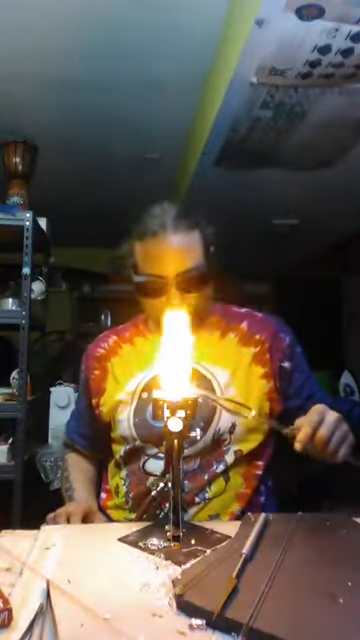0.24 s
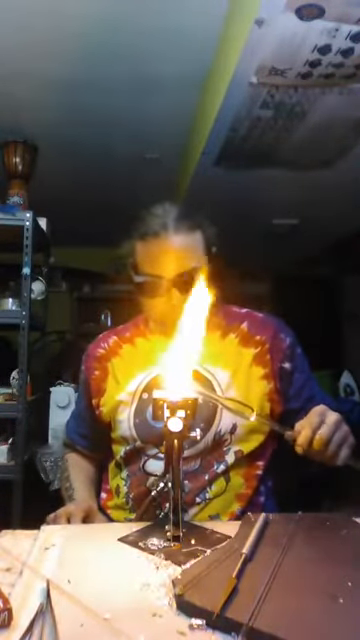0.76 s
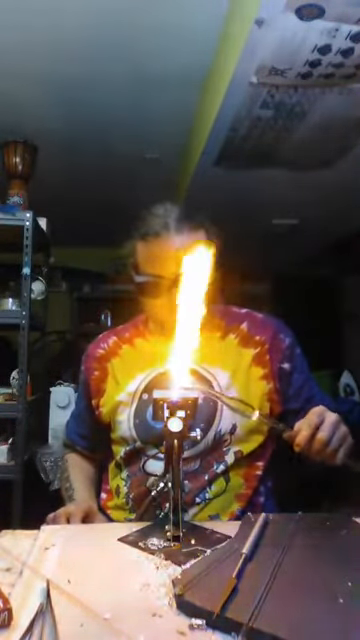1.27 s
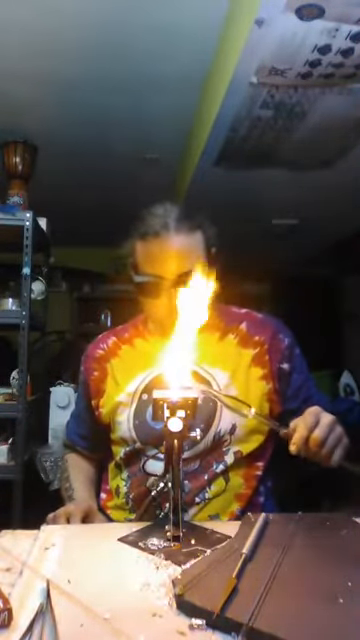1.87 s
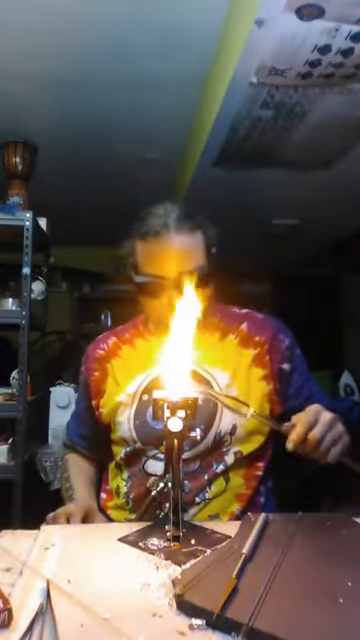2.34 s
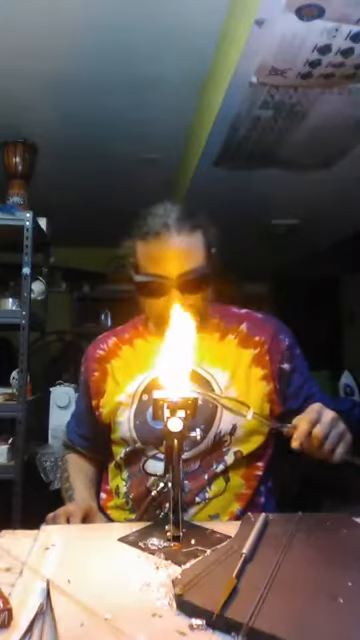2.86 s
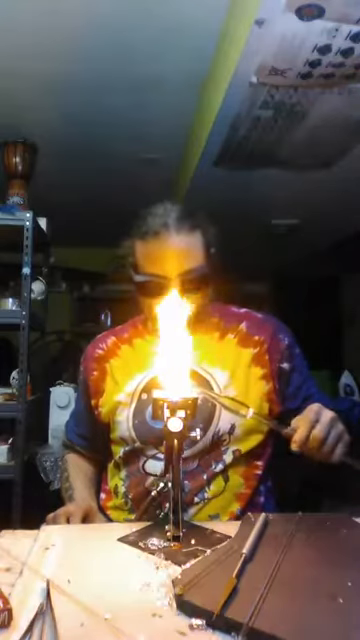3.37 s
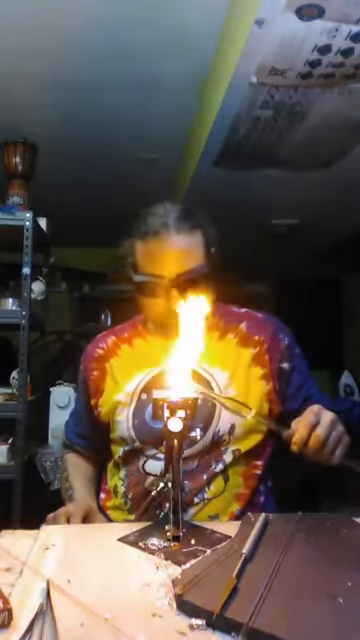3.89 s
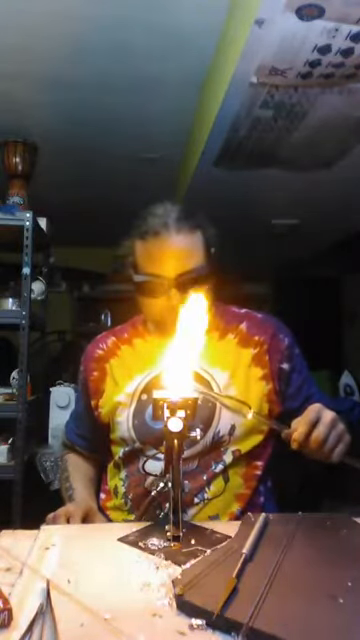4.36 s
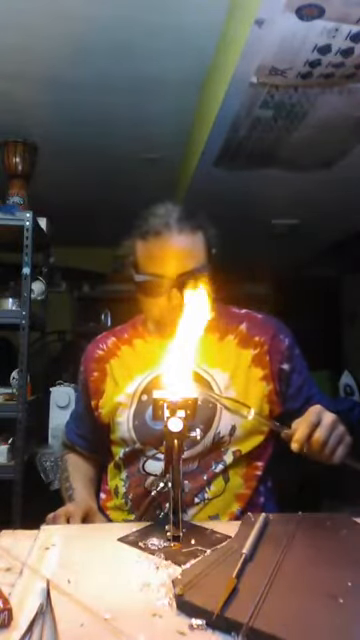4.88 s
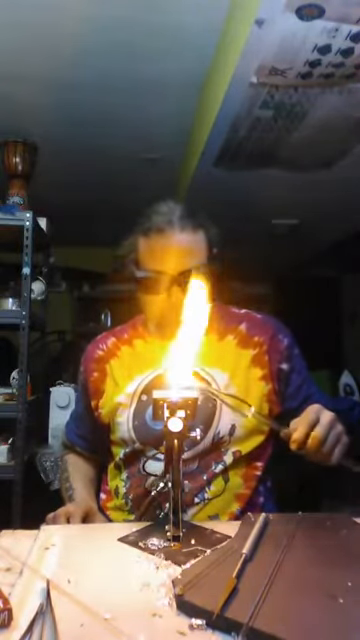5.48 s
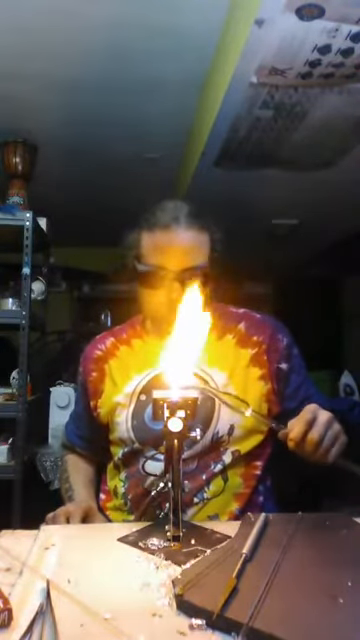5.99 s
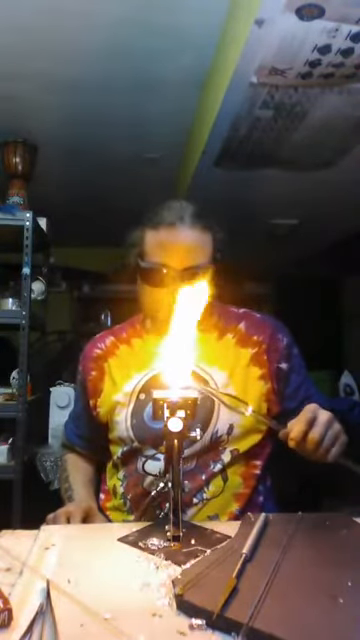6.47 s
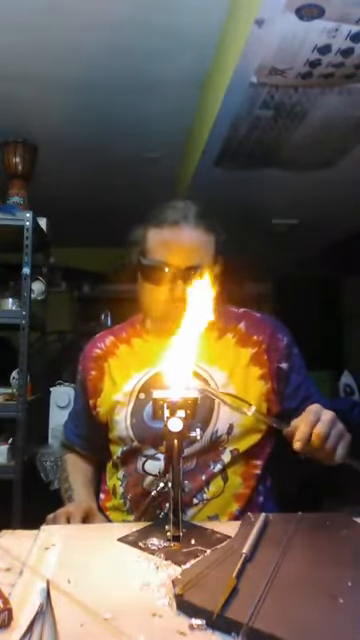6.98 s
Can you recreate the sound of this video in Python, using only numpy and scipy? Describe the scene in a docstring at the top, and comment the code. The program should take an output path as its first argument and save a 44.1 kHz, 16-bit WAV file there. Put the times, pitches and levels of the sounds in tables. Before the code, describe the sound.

In a small workshop a bench torch burns continuously, a bright, airy hiss with a rougher mid roar and low flutter. An extractor fan hums deeply and rumbles behind. Occasional soft, dull pops come from the flame. Near six seconds a short puff of air spits and whistles, then everything cuts out for an instant before resuming. One nearby microphone, same sound on both channels, short room echo.

```python
"""In a workshop a bench torch burns with a bright steady hiss; an extractor fan hums and rumbles behind it.
The torch is noise in three layers (low flutter, mid roar, hiss), the fan is sine tones over low noise.
Now and then the flame swells briefly or gives a soft dull pop, a decaying sine.
Near six seconds a puff of air spits out in spurts of noise; just after, the sound drops out for about 0.13 s.
One microphone feeds both channels."""
import sys
import numpy as np
from scipy import signal
from scipy.fft import rfft, irfft, next_fast_len
from scipy.io import wavfile

SR = 44100
rng = np.random.default_rng(int(sys.argv[2]) if len(sys.argv) > 2 else 0)


def voltage_ratio(level):
    """Linear amplitude factor for a level in decibels (scalar or array-like)."""
    return 10 ** (np.asarray(level, float) / 20)


def bounce(signal):
    """Save signal as a 16-bit WAV file at the path given by the first command-line argument."""
    frames = np.transpose(np.atleast_2d(signal))
    limited = np.clip(frames, -1, 1)
    pcm = np.round(limited * 32767).astype(np.int16)
    wavfile.write(sys.argv[1], SR, pcm)


N = 319284  # length in samples


def rms_one(x):
    """Scale to rms 1."""
    return x / np.sqrt(np.mean(x ** 2) + 1e-20)


def drift(rate_hz):
    """Slow chance wander of spread 1: noise at a fortieth of SR, twice through a one-pole low-pass at rate_hz."""
    pole = np.exp(-80 * np.pi * rate_hz / SR)
    coarse = rng.standard_normal(N // 40 + 4002)
    slow = signal.lfilter([1], [1, -2 * pole, pole * pole], coarse)[4000:]  # the run-in is left off
    return np.interp(np.arange(N) / 40, np.arange(len(slow)), rms_one(slow - slow.mean()))


def coloured_noise(spectrum=((20, -90), (20000, -90)), peaks=(), patchy_db=0, rate_hz=8, count=8):
    """Noise of rms 1 with a smooth spectrum plus resonances; neighbouring bands flicker each in their own way."""
    # narrow cancellations by nearby echoes: centre_hz, width_hz, dip_db
    echo_dips = [(2340, 63, -3), (2840, 48, -2), (3140, 94, -8), (3850, 42, -3), (4270, 44, -5),
                 (4370, 36, -5), (6320, 48, -2), (10920, 72, -2), (13200, 86, -5)]
    size = next_fast_len(N)
    hz = np.maximum(np.fft.rfftfreq(size, 1 / SR), 1)
    corner_hz, corner_db = np.transpose(spectrum)
    power = voltage_ratio(2 * np.interp(np.log(hz), np.log(corner_hz), corner_db, -90, -90))
    for centre_hz, width_hz, top_db in peaks:
        power = power + voltage_ratio(2 * top_db) / (1 + (2 * (hz - centre_hz) / width_hz) ** 2) ** 2
    for centre_hz, width_hz, dip_db in echo_dips:
        power = power * voltage_ratio(2 * dip_db / (1 + (2 * (hz - centre_hz) / width_hz) ** 2))
    noise = rfft(rng.standard_normal(size)) * np.sqrt(power)

    place = count * np.cumsum(power) / np.sum(power)  # overlapping bands, spaced by equal power
    total = np.zeros(N)
    for k in range(count + 1):
        band = irfft(noise * np.clip(1 - np.abs(place - k), 0, 1), size)[:N]
        total += band * voltage_ratio(patchy_db * drift(rate_hz))
    return rms_one(total)


def torch():
    """Turbulent jet: the flame tip flaps in low lumps, the mid roar wanders, the bright hiss is smoother."""
    # flapping of the flame tip: freq_hz, density_db (relative, per Hz)
    flutter_spectrum = [(170, -8), (260, -1), (450, -3.5), (760, -3), (950, -4.5), (1250, -7.5),
                        (1500, -18.5), (1900, -33)]
    # jet noise between the resonances: freq_hz, density_db (relative, per Hz)
    roar_spectrum = [(1100, -40), (1350, -12), (1650, -14), (1750, -6), (2300, -8), (2700, -11),
                     (3100, -11), (3600, -12), (4300, -20), (4500, -30)]
    hiss_spectrum = [(4200, -42), (4450, -13), (5250, -13), (5400, -9), (6300, -11), (8400, -9), (9100, -5),
                     (10500, -12), (10900, -13), (12600, -12), (12850, -17), (13250, -14), (13500, -13),
                     (14000, -14)]
    # resonances of nozzle, bench and room: centre_hz, width_hz, density_db (relative, per Hz)
    roar_peaks = [(1440, 54, -11), (1590, 100, -14), (1750, 45, -5), (1900, 45, -5), (1960, 30, -6),
                  (2070, 104, -1), (2250, 54, -10), (2370, 47, -7), (2630, 325, -4), (2750, 38, -6),
                  (2940, 70, -6), (3180, 192, -6), (3410, 72, -9), (3520, 163, -8), (3690, 67, -12),
                  (3900, 50, -10), (4020, 165, -12), (4200, 111, -12), (4350, 125, -13)]
    hiss_peaks = [(4580, 341, -13), (4870, 69, -10), (5060, 184, -15), (5340, 46, -7), (5410, 48, -8),
                  (5530, 88, -5), (5750, 70, -5), (5890, 100, -7), (6040, 125, -6), (6530, 125, -10),
                  (6920, 100, -11), (7290, 36, -9), (7680, 36, -12), (7930, 61, -7), (8090, 45, -10),
                  (8750, 200, -4), (9060, 241, -2), (9310, 42, -4), (9390, 42, -2), (9640, 200, -6),
                  (9960, 44, -5), (10170, 47, -7), (10420, 201, -7), (10620, 130, -4), (11000, 90, -9),
                  (11150, 150, -9), (11300, 100, -8), (11540, 200, -10), (11980, 54, -14), (12390, 149, -9),
                  (13540, 56, -16), (13890, 184, -13)]
    # brief swells of the flame: centre_s, length_s, flutter_gain_db, roar_gain_db
    swells = [(.21, .08, .5, 2), (1.2, .15, 3.5, 0), (4.52, .04, 0, 2.5), (4.95, .2, .5, 1.2),
              (5.83, .05, 0, 3), (5.92, .04, 4, 0)]
    wander_hz = 2.5

    gust = drift(7.6)  # shared by roar and hiss
    flutter_db = -51.5 + 0.8 * drift(wander_hz) + 1.2 * drift(20.0)
    roar_db = -43.1 + 0.4 * drift(wander_hz) + 0.32 * gust
    hiss_db = -36.5 + 0.25 * drift(wander_hz) + 0.34 * gust
    for centre_s, length_s, flutter_gain_db, roar_gain_db in swells:
        swell = np.exp(-((np.arange(N) / SR - centre_s) / length_s) ** 2)
        flutter_db = flutter_db + flutter_gain_db * swell
        roar_db = roar_db + roar_gain_db * swell

    flutter = voltage_ratio(flutter_db) * coloured_noise(flutter_spectrum, patchy_db=2.5, rate_hz=12.4, count=10)
    roar = voltage_ratio(roar_db) * coloured_noise(roar_spectrum, roar_peaks, patchy_db=2.4, rate_hz=10.2, count=12)
    hiss = voltage_ratio(hiss_db) * coloured_noise(hiss_spectrum, hiss_peaks, patchy_db=0.86, rate_hz=12.0, count=12)
    return flutter + roar + hiss


def flame_pops():
    """Soft dull pops of the flame: each is a sine that swells quickly and dies away."""
    # pops, levels ahead of the room: start_s, peak_db, pitch_hz
    pops = [(1.102, -41, 455), (1.159, -47, 444), (2.129, -44.5, 775), (3.123, -41, 301), (5.427, -41, 430),
            (6.734, -41.5, 449), (6.962, -38, 750), (7.128, -43, 684)]
    t = np.arange(N) / SR
    out = np.zeros(N)
    for start_s, peak_db, pitch_hz in pops:
        age = np.maximum(t - start_s, 0) / 0.0041  # in units of the 4.1 ms rise
        out += voltage_ratio(peak_db) * age * np.exp(1 - age) * np.sin(2 * np.pi * pitch_hz * t)
    return out


def puff():
    """A burst of air in spurts, then a leak: a low spit and a narrow whistling hiss, both sputtering."""
    # spurts, levels ahead of sputter and room: start_s, length_s, spit_db, whistle_db
    spurts = [(5.989, .013, -30, -32), (6.0045, .0035, -30, -29.5), (6.0125, .023, -39, -30.5),
              (6.041, .005, -45, -33)]
    # what the puff sounds through: centre_hz, width_hz, density_db (relative, per Hz)
    spit_peaks = [(955, 150, -1.5), (1240, 180, -2.5), (1860, 130, 1), (2090, 570, -3), (2600, 440, -3),
                  (3570, 2000, -7), (7000, 3500, -15)]
    whistle_peaks = [(4420, 300, -12), (5320, 200, 0), (5540, 300, -4.5), (5900, 250, -2),
                     (6500, 1500, -16)]

    # from the last spurt on, the air leaks away slowly
    leak = spurt(spurts[-1][0], spurts[-1][1], fall_db_per_ms=0.25)
    spit, whistle = voltage_ratio(-48) * leak, voltage_ratio(-38) * leak
    for start_s, length_s, spit_db, whistle_db in spurts:
        gain = spurt(start_s, length_s, fall_db_per_ms=6.0)
        spit = np.maximum(spit, voltage_ratio(spit_db) * gain)
        whistle = np.maximum(whistle, voltage_ratio(whistle_db) * gain)
    low = spit * voltage_ratio(2.0 * drift(150.0)) * coloured_noise(peaks=spit_peaks, count=1)
    high = whistle * voltage_ratio(2.5 * drift(120.0)) * coloured_noise(peaks=whistle_peaks, count=1)
    return low + high


def spurt(start_s, length_s, fall_db_per_ms):
    """Gain that rises by 5 dB per ms up to start_s, holds at 1 for length_s and falls."""
    ms = (np.arange(N) / SR - start_s) * 1000
    held_ms = length_s * 1000
    return voltage_ratio(np.clip(np.minimum(5.0 * ms, fall_db_per_ms * (held_ms - ms)), -200, 0))


def fan():
    """Magnetic hum at multiples of the mains, blade tones at multiples of the shaft, their sums, and air rumble."""
    # moving air: freq_hz, density_db (relative, per Hz)
    rumble_spectrum = [(20, -12), (45, 2), (58, -2.5), (100, 3), (160, 0.5), (200, -4.5), (300, -16.5),
                       (450, -25.5)]
    # motor tones: mains_multiple, shaft_multiple (no units)
    tones = [(1, 0), (0, 4), (2, -1), (2, 0), (2, 1), (0, 8), (2, 2), (3, 0), (0, 12), (4, 0), (4, 2),
             (6, 0), (0, 20), (6, 1), (0, 24), (0, 25), (8, 0)]
    # one row for each tone: rms_db, waver_db
    tone_levels = [(-59, 4.5), (-53, 0.5), (-57, 0.5), (-41.5, 0.63), (-62, 3.5), (-75, 1), (-61, 3),
                   (-73, 2), (-62.5, 4), (-64.5, 1), (-78, 6), (-79, 4), (-71, 1), (-72, -4.5),
                   (-68.5, 1.5), (-74.5, 3.5), (-76, 1)]
    mains_hz, shaft_hz = 59.97, 18.335
    t = np.arange(N) / SR
    out = voltage_ratio(-53.5) * coloured_noise(rumble_spectrum, patchy_db=3.0, rate_hz=5.3, count=4)
    for (mains, shaft), (rms_db, waver_db) in zip(tones, tone_levels):
        pitch_hz = mains * mains_hz + shaft * shaft_hz
        phase = 2 * np.pi * (pitch_hz * t + rng.random())
        level = np.sqrt(2) * voltage_ratio(rms_db + waver_db * drift(3.4))
        out += level * np.sin(phase + 0.19 * waver_db * drift(1.5))  # the phase wavers too
    return out


def workshop(x, room_db):
    """A dense tail of echoes: it roughens the spectrum with fine ripples and lets bursts die away."""
    t60_s = 0.2
    t = np.arange(SR // 2) / SR
    tail = rng.standard_normal(len(t)) * voltage_ratio(-60 * t / t60_s) * (t > .004)
    tail = tail / np.sqrt(np.sum(tail ** 2))
    wet = x + voltage_ratio(room_db) * signal.fftconvolve(x, tail)[:N]
    return wet / np.sqrt(1 + voltage_ratio(2 * room_db))  # steady noise keeps its level


def scene():
    """All sources reach one microphone; the long fan waves fill the room evenly, so they get no echo tail."""
    near = workshop(torch() + puff() + flame_pops(), room_db=-8.5)
    return np.tile(near + fan(), (2, 1))


def top_cut(x):
    """Nothing passes above the cut-off."""
    return signal.sosfilt(signal.butter(12, 14980, fs=SR, output="sos"), x)


def record(dry):
    """The top is cut steeply at 13.92 kHz, then the sound drops out briefly."""
    silent_from_s, silent_to_s = 6.1365, 6.268
    fade_out_s, fade_in_s = 0.0056, 0.0006
    t = np.arange(N) / SR
    low_pass = signal.ellip(16, .5, 90, 13920, fs=SR, output="sos")
    cut = signal.sosfilt(low_pass, dry)
    passing = np.maximum((silent_from_s - t) / fade_out_s, (t - silent_to_s) / fade_in_s)
    return top_cut(cut * np.clip(passing, 0, 1))


dry = scene()
out = record(dry)
bounce(out)
```